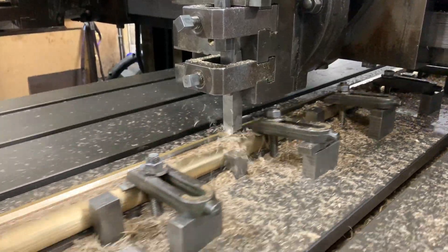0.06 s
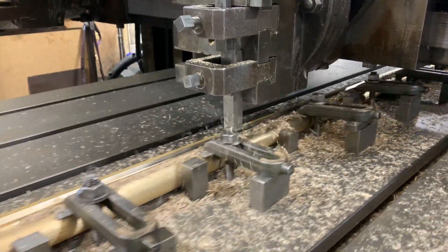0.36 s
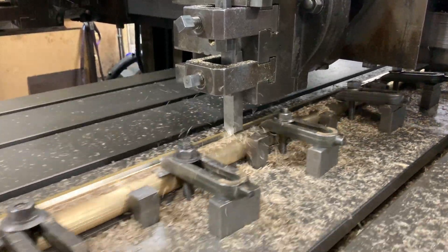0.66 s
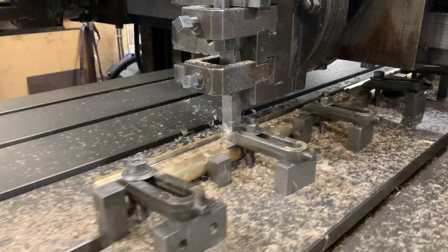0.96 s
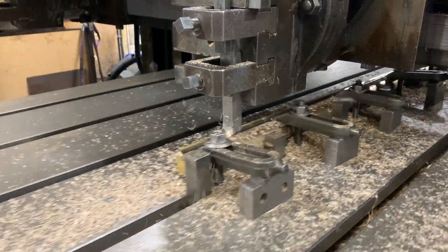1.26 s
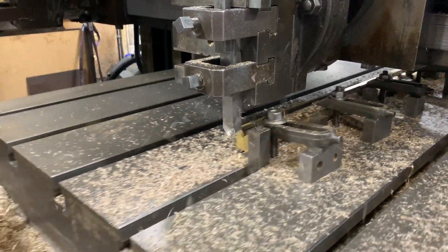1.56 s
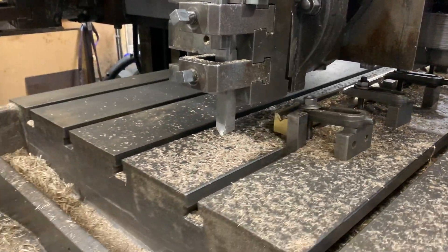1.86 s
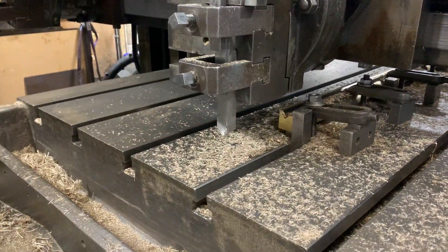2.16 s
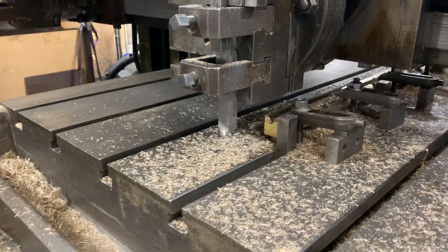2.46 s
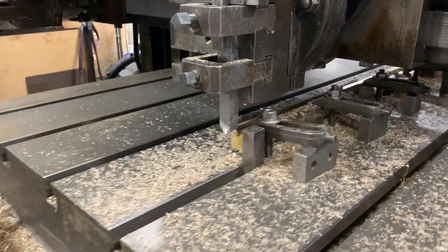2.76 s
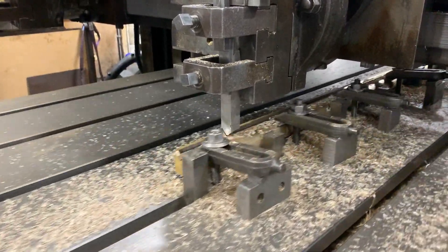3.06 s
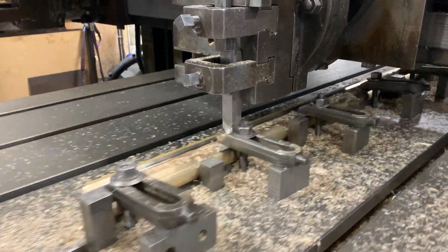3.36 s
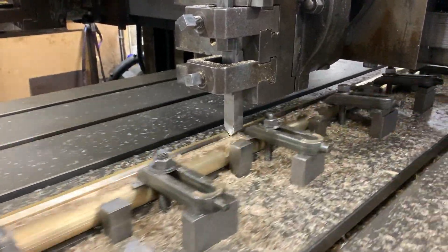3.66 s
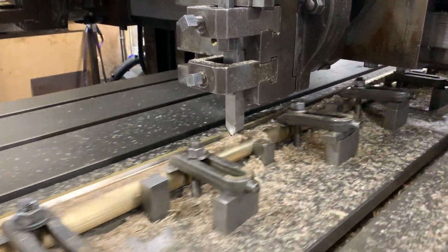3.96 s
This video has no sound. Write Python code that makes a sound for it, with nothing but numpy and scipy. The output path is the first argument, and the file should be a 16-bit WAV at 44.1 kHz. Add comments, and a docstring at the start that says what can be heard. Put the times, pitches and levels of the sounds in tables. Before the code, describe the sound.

A metal planer scrapes along a bar close by in a workshop, hissing and chattering with brief squeals over a machine rumble. The cut stops at about 1.5 seconds. Sharp steel clacks and knocks follow until 2 seconds as the drive reverses, then it sinks to a hum with a faint whirr. From about 3 seconds the gears rumble louder and whine upward as the table runs back.

```python
"""A metal planer's tool scrapes a chip off a bar, heard from beside the table in a workshop.
Tiny fractures hiss and excite the resonances of tool and bar; the shank chatters and briefly squeals.
The tool runs off the end and clacks in its holder. The drive knocks into reverse and sinks to a hum.
As the table speeds back, a bearing whirrs and the gears rumble, whine upward and ring their casing."""
import sys
import numpy as np
from scipy import signal
from scipy.fft import rfft, irfft, next_fast_len
from scipy.io import wavfile
from scipy.ndimage import uniform_filter1d, map_coordinates

SR = 44100
rng = np.random.default_rng(int(sys.argv[2]) if len(sys.argv) > 2 else 0)


def generate_wav(sig):
    """Save sig (samples, or channels by samples) to the path in sys.argv[1] as 16-bit PCM at SR."""
    pcm = np.round(np.clip(np.atleast_2d(sig).T, -1, 1) * 32767).astype(np.int16)
    wavfile.write(sys.argv[1], SR, pcm)


N = 176400
T = np.arange(N) / SR
CUT_END_S, CUT_T60_S, REVERSE_S = 1.556, 0.032, 1.905
TOOTH_SPREAD_DB = 1.5

# strength of the tool's chatter: t/s, level/dB
CHATTER = [(0, -26.5), (.1, -35), (.2, -41.5), (.33, -43), (.46, -34), (.62, -34.5), (.83, -40),
           (.88, -35.5), (1.0, -29), (1.2, -30.5), (1.33, -33.5), (1.5, -30)]
# load on the drive: t/s, rumble level/dB, gear rattle level/dB
DRIVE_LOAD = [(0, -41, -39.5), (.36, -39.5, -43), (.41, -34.5, -33.5), (.52, -36.5, -41), (.83, -41, -41),
              (1.05, -37.5, -36.5), (1.2, -37.5, -41.5), (1.42, -35.5, -37), (1.72, -35, -39.5),
              (1.82, -32.5, -33), (2.0, -40.5, -39.5), (2.25, -43.5, -41.5), (2.65, -36.5, -42),
              (3.0, -34.5, -39), (3.17, -31, -37), (3.55, -35.5, -34), (3.72, -32, -33), (4, -33.5, -33)]
# steel clacks of the tool holder: t/s, level/dB, T60/s
CLACKS = [(1.59, -19, 0.078), (1.7095, -16, 0.09), (1.7128, -14, .017)]
# gear mesh on the return stroke: t/s, f/Hz, level/dB
RETURN_MESH = [(2.8, 160, -60), (3.05, 178, -45), (3.17, 184, -31), (3.23, 192, -46), (3.34, 199, -32),
               (3.45, 203, -30.5), (3.56, 210, -38), (3.69, 215, -35), (3.77, 216, -27), (3.88, 217, -25),
               (4, 216, -22.5)]


def amp(db):
    """Amplitude ratio of a level."""
    return 10 ** (np.asarray(db) / 20)


def unit(x):
    """Normalisation to rms 1."""
    return x / np.sqrt(np.mean(x ** 2) + 1e-20)


def along(points, hz):
    """Interpolation of (f/Hz, value) points on a logarithmic frequency axis."""
    f, values = np.transpose(points)
    return np.interp(np.log(hz + 1), np.log(f + 1), values)


def curves(rows):
    """Linear interpolation in time: one value per sample for each column after t/s."""
    times, *columns = np.transpose(rows)
    return [np.interp(T, times, column) for column in columns]


def wobble(rate):
    """Smooth random modulation: a spline through rate Gaussian values a second."""
    return map_coordinates(rng.standard_normal(int(N * rate / SR) + 4), [T * rate])


def filtered(x, response):
    """Linear filtering: the spectrum of x times a complex frequency response."""
    size = next_fast_len(N + 8192)
    return irfft(rfft(x, size) * response(np.fft.rfftfreq(size, 1 / SR)), size)[..., :N]


def spread(pair, response):
    """Partial coherence: two independent signals, filtered, become the mid and side of a stereo pair."""
    # likeness of left and right: f/Hz, correlation
    coherence = [(60, 0.94), (200, 0.81), (350, 0.58), (600, 0.18), (1500, 0.0099), (3000, 0.081),
                 (4200, 0.62), (6300, 0.17), (7500, 1), (9000, 1), (15000, 1)]

    def blend(hz):
        angle = np.arccos(np.clip(along(coherence, hz), -1, 1)) / 2
        return response(hz) * np.array([np.cos(angle), np.sin(angle)])
    mid, side = filtered(pair, blend)
    return np.array([mid + side, mid - side])


def noise(spectrum, grain=1):
    """Source and filter: white noise, modulated by grain, takes on a spectrum; stereo, rms 1."""
    return unit(spread(grain * rng.standard_normal((2, N)), lambda hz: amp(along(spectrum, hz))))


def resonate(modes, grain=1, order=2):
    """Forced vibration: noise, modulated by grain, drives band-pass resonances; stereo, rms 1."""
    def response(f):
        return sum(amp(db) * (1j * f * width / (centre ** 2 - f ** 2 + 1j * f * width)) ** order
                   for centre, width, db in modes)
    return unit(spread(grain * rng.standard_normal((2, N)), response))


def tone(hz, db, drift_hz, flutter_db, rate=14):
    """A sinusoid under random frequency and amplitude modulation."""
    phase = 2 * np.pi * (np.cumsum(hz + drift_hz * wobble(rate)) / SR + rng.random())
    return np.sqrt(2) * amp(db + flutter_db * wobble(rate)) * np.sin(phase)


def decay(start, t60):
    """Damping: full level until start, then a fall of 60 dB per t60 seconds, down to -120 dB."""
    return amp(-60 * np.clip((T - start) / t60, 0, 2))


def strike(start, t60, attack_s=0.00067):
    """Envelope of an impact: a fast rise and an exponential decay."""
    return (1 - np.exp(-np.maximum(T - start, 0) / attack_s)) * decay(start, t60)


def blows(rows, spectrum):
    """Impacts excite a broad band: noise bursts of one spectrum, each with its own decay."""
    return noise(spectrum) * sum(amp(db) * strike(start, t60) for start, db, t60 in rows)


def room(x, wet_db):
    """Reverberation: adds the workshop's diffuse tail, whose treble dies first."""
    # reverberation time: f/Hz, T60/s
    reverb_times = [(200, 1), (2000, 1), (6000, 0.5), (14000, 0.22)]
    hz, t, spectra = signal.stft(rng.standard_normal((2, SR // 2)), SR, nperseg=256)
    absorption = amp(-60 * t / along(reverb_times, hz)[:, None])
    tail = signal.istft(spectra * absorption, SR, nperseg=256)[1]
    echo = signal.fftconvolve(np.atleast_2d(x), tail / np.linalg.norm(tail[0]), axes=1)[:, :N]
    return x + amp(wet_db) * spread(echo, np.ones_like)


def waver(x, depth=0.006):
    """Frequency modulation: the pitch wanders as the chip thickens and thins."""
    positions = np.arange(N) + depth * np.cumsum(wobble(12))
    return np.array([map_coordinates(side, [positions], order=5, mode="mirror") for side in x])


def patchy(x, depth_db):
    """Amplitude modulation by band: parts of the spectrum flare and fade on their own; rms 1."""
    spectra = signal.stft(x, nperseg=512)[2]
    field = uniform_filter1d(rng.standard_normal(spectra.shape[1:]), size=4, axis=0)
    field = unit(uniform_filter1d(field, size=7, axis=1))
    return unit(signal.istft(spectra * amp(depth_db * field), nperseg=512)[1][:, :N])


def scrape():
    """Random excitation: the chip's tiny fractures hiss, ring tool and bar and make the shank chatter."""
    # hiss of the tearing chip: f/Hz, level/dB
    chip_spectrum = [(300, 0), (1300, -9), (2800, -6.5), (4800, -2), (6500, -5), (9500, 0), (11900, -8.5),
                     (13200, -8), (15600, -13)]
    # resonances of tool and bar: f/Hz, bandwidth/Hz, level/dB
    tool_modes = [(3865, 86, -1.5), (4102, 170, 5.5), (4262, 83, 5.5), (5670, 180, 5), (5850, 26, 11.5),
                  (6043, 270, 5.5), (7070, 300, -3.5), (7710, 480, -1.5), (10140, 330, 1),
                  (10590, 360, -1.5), (11770, 470, -5.5)]
    # bending modes of the shank: f/Hz, bandwidth/Hz, level/dB
    shank_modes = [(877, 94, -9.5), (1709, 92, 4), (1791.6, 120, 5), (3547, 154, -13.5)]
    # how hard the tool bites: t/s, gain/dB
    bite = [(0, 0.5), (.8, 0.5), (1.0, 0), (1.44, 0.5), (1.5, 3), (1.55, 6)]
    bite_db, = curves(bite)
    chatter_db, = curves(CHATTER)
    cracks = amp(0.5 * wobble(1800) + 1.5 * wobble(69.73))
    hiss = amp(-39.5) * patchy(noise(chip_spectrum, cracks), depth_db=2.7)
    ring = amp(-36.5) * patchy(waver(resonate(tool_modes, cracks)), depth_db=2.5)
    chatter = amp(chatter_db + 0.37 * wobble(61)) * resonate(shank_modes, cracks, order=3)
    return room((amp(bite_db) * (hiss + ring) + chatter) * decay(CUT_END_S, CUT_T60_S), wet_db=-11)


def squeals():
    """Nonlinear oscillation: the shank sings, and its overtones grow faster than its swing."""
    # moments when the chatter locks into a squeal: t/s, level/dB, half length/s
    surges = [(.408, -27, .0047), (.554, -23.5, .0055), (.878, -30, .009), (.968, -29, .007),
              (1.024, -23.5, .0078), (1.047, -18, .0089), (1.122, -26, .013), (1.255, -28, .01),
              (1.302, -24.5, .009), (1.375, -22, .0065), (1.487, -25.5, .012), (1.546, -25, .008)]
    # harmonics of a full squeal, from the second up: relative level/dB
    overtones_db = [-8.5, -26, -15, -14, -8, -22]
    squeal_hz, full_db, sustain_db = 1775, -17, -6.5
    overtone_growth, jitter_rad = 1.9, 0.15
    chatter_db, = curves(CHATTER)
    steady = amp(chatter_db + sustain_db + 0.41 * wobble(54.2)) * decay(CUT_END_S, CUT_T60_S)
    peaks = sum(amp(db) * np.exp(-((T - centre) / half) ** 2) for centre, db, half in surges)
    swing = np.hypot(steady, peaks) / amp(full_db)
    phase = 2 * np.pi * np.cumsum(squeal_hz + 22 * wobble(160)) / SR
    overtones = sum(amp(db) * np.sin(k * phase + jitter_rad * k * wobble(600))
                    for k, db in enumerate(overtones_db, start=2))
    vibration = swing * np.sin(phase) + swing ** overtone_growth * overtones
    return room(np.sqrt(2) * amp(full_db) * vibration, wet_db=-13)


def drive():
    """Structure-borne sound: bed and gears shake under load, over the motor's hum and a rush of air."""
    # rumble of bed and table: f/Hz, level/dB
    rumble_spectrum = [(25, -35), (45, -19), (85, -19), (115, -14), (160, 2), (192, 2.5), (225, 4.5),
                       (258, -4), (295, 6), (350, 2.5), (400, 0.5), (455, 3.5), (560, -9), (900, -11.5),
                       (2500, -40.5)]
    # resonances of the bed: f/Hz, bandwidth/Hz, level/dB
    bed_modes = [(193, 6.3, -4.5), (229.7, 7, -4), (294.2, 15.7, 5.5), (333, 21, -3.5)]
    # rattle of the gear train: f/Hz, level/dB
    gear_spectrum = [(250, 6.5), (480, -8.5), (600, 3), (700, 7), (790, 4.5), (885, 7), (1030, -1.5),
                     (1200, -1.5), (1450, -2.5), (1800, -9), (2600, -11), (5000, -25.5)]
    # tones of motor and shafts: f/Hz, level/dB
    motor_tones = [(49.5, -54), (62.3, -53)]
    # workshop air and belts: f/Hz, level/dB
    air_spectrum = [(40, 0), (400, -6), (1500, -3), (2000, -2.5), (2550, -5.5), (3100, -12), (3600, -7.5),
                    (4600, -12.5), (6400, -10.5), (8500, -15), (12500, -14), (13500, -21), (15700, -32)]
    rumble_db, rattle_db = curves(DRIVE_LOAD)
    rumble_gain = amp(rumble_db + 0.65 * wobble(30.83))
    rumble = rumble_gain * (noise(rumble_spectrum) + amp(-7.5) * resonate(bed_modes))
    rattle = amp(rattle_db + 1.02 * wobble(45)) * noise(gear_spectrum, amp(TOOTH_SPREAD_DB * wobble(350)))
    hum = sum(tone(hz, db, drift_hz=0.61, flutter_db=3) for hz, db in motor_tones)
    hum *= amp(0.25 * (rumble_db - rumble_db.mean()))  # follows a quarter of the rumble's swing in dB
    air = amp(-44 + 0.43 * wobble(25.22)) * noise(air_spectrum)
    return rumble + rattle + hum + air


def cutting_gears():
    """Periodic tooth contact: steady tones follow the load and die away once the drive reverses."""
    # gear tones of the cutting stroke: f/Hz, level/dB relative to the rumble
    gear_tones = [(191, -8), (218, -8.5), (281, -9.5), (413, -7.5)]
    load_db, _ = curves(DRIVE_LOAD)
    tones = sum(tone(hz, load_db + db, drift_hz=1.2, flutter_db=1.5) for hz, db in gear_tones)
    return tones * decay(REVERSE_S, t60=0.62)


def holder_clacks():
    """Impact noise: the steel holder clacks and rattles to rest."""
    # rattles as it settles: t/s, level/dB, T60/s
    rattles = [(1.738, -39, .12), (1.762, -36, .11), (1.801, -33.5, .07), (1.866, -41, .07)]
    # spectrum of a clack or rattle: f/Hz, level/dB
    clack_spectrum = [(300, 0), (1500, 5.5), (2400, 5.5), (3000, 4.5), (3500, 2), (4300, 11), (5200, 1.5),
                      (7000, 5), (9000, 7.5), (12000, 4.5), (14000, -1)]
    return room(blows(CLACKS + rattles, clack_spectrum), wet_db=-9)


def drive_knocks():
    """Impulse excitation: each knock of the reversing drive, and a small tick of the gears on the return
    stroke, sets its hollow housing ringing."""
    # knocks of the drive: t/s, level/dB, T60/s
    knocks = [(1.633, -29, .1), (1.746, -28, .14), (1.765, -27.5, .12), (1.7945, -19, .025),
              (1.802, -19, .035), (3.451, -27, .03)]
    # spectrum of a knock: f/Hz, level/dB
    knock_spectrum = [(50, -20), (150, -5), (300, 4), (380, -2), (495, 7), (620, -4), (850, -2),
                      (1100, -11), (1500, -10), (2100, -21), (3200, -25), (8000, -44), (15000, -60)]
    ring_envelope = sum(amp(db) * strike(start, t60=0.055) for start, db, _ in knocks)
    housing = tone(hz=505, db=-3, drift_hz=10.24, flutter_db=10.5) * ring_envelope
    return room(blows(knocks, knock_spectrum) + housing, wet_db=-10)


def holder_ring():
    """Free vibration: the holder's damped modes ring on after the hardest clack."""
    # modes of the holder: f/Hz, relative level/dB, T60/s
    holder_modes = [(1190, -25, .09), (1765, -23, .12), (2990, -23, .07), (4441, -15.5, .115),
                    (4500, -13.5, .115), (6939, -21, .07), (12660, -17, .05)]
    hardest_s, _, _ = max(CLACKS, key=lambda row: row[1])
    return sum(tone(hz, db - 8, drift_hz=15, flutter_db=1, rate=150) * strike(hardest_s, t60)
               for hz, db, t60 in holder_modes)


def linkage_ticks():
    """Light impacts: the shift linkage gives short, bright transients."""
    # ticks of the linkage: t/s, level/dB, T60/s
    ticks = [(1.806, -29, .05), (1.867, -32, .05), (2.018, -27, .035)]
    # spectrum of a tick: f/Hz, level/dB
    tick_spectrum = [(400, -17), (1400, 3), (2200, -9), (3000, 3), (3200, 10), (3400, 4), (3700, -20),
                     (4200, -12), (8000, -20), (15000, -28)]
    return room(blows(ticks, tick_spectrum), wet_db=-12)


def bearing_whirr():
    """Amplitude modulation: on the return stroke a bearing's narrow-band noise pulses with its shaft."""
    centre_hz, bandwidth_hz, shaft_hz = 2235, 165, 12.2
    onset = 1 - decay(REVERSE_S, t60=1)
    turn = np.sin(2 * np.pi * shaft_hz * T)
    return onset * amp(-51 + 3.2 * turn) * resonate([(centre_hz, bandwidth_hz, 0)])


def return_gears():
    """Mesh frequency is proportional to speed: the gears' whine climbs as the table runs back."""
    # partials of the mesh tone: frequency ratio, relative level/dB
    partials = [(1, 0), (1.5, -16), (2, -17), (3.9, -19)]
    # thin whine of the gearbox: t/s, f/Hz, level/dB
    whine_track = [(3.42, 484, -60), (3.52, 489, -42), (3.62, 491, -37.5), (3.72, 492, -42),
                   (3.82, 494, -46), (4, 496, -42)]
    mesh_hz, mesh_db = curves(RETURN_MESH)
    mesh = sum(tone(k * mesh_hz, mesh_db + db, drift_hz=1.2 * k, flutter_db=0.7, rate=30)
               for k, db in partials)
    whine = tone(*curves(whine_track), drift_hz=1, flutter_db=1.5)
    return (mesh + whine) * (T > REVERSE_S)


def gearbox_casing():
    """Forced resonance: the racing gears ring their casing, harder once per turn of the shaft."""
    # ringing that swells on the return stroke: t/s, level/dB
    swell = [(2.6, -52), (3.0, -45), (3.25, -37), (3.36, -34), (3.52, -32), (3.62, -32.5), (3.75, -37),
             (4, -38)]
    # resonances of the casing: f/Hz, bandwidth/Hz, level/dB
    casing_modes = [(440, 14, -3), (492, 12, -1), (845, 30, -2), (890, 45, 0), (1015, 70, -3),
                    (1400, 220, -13)]
    teeth, pulse_db = 14, 2
    swell_db, = curves(swell)
    mesh_hz, _ = curves(RETURN_MESH)
    turn = np.sin(2 * np.pi * np.cumsum(mesh_hz / teeth) / SR)
    return amp(swell_db + pulse_db * turn) * resonate(casing_modes, amp(TOOTH_SPREAD_DB * wobble(350)))


def scene():
    """Superposition: the cut, the running machinery and the impacts add."""
    cut = scrape() + squeals()
    machinery = drive() + cutting_gears() + return_gears() + gearbox_casing() + bearing_whirr()
    ring = holder_ring()
    impacts = drive_knocks() + holder_clacks() + room(ring, wet_db=-19) + linkage_ticks()
    return cut + machinery + impacts


def record(dry):
    """Spaced microphones differ in level and phase; the deepest bass and the top treble are cut."""
    # left over right: f/Hz, level difference/dB
    balance = [(50, 1), (300, 2), (900, 3.5), (1800, 1.5), (2800, 1), (4500, -2.5), (6000, -5),
               (7500, -0.5), (15000, 0.5)]
    # lead of the left: f/Hz, phase/rad
    lead = [(0, 0), (2200, 0), (3500, 1), (5300, 1.6), (6500, 0), (8650, -3.14), (11000, -6.28),
            (13350, -9.42), (15500, -12.57)]
    low_cut_hz, top_hz = 50, 15800
    sides = np.array([[0.5], [-0.5]])

    def response(hz):
        gain = amp(sides * along(balance, hz))
        phase = sides * np.interp(hz, *np.transpose(lead))
        low_cut = 1 / np.sqrt(1 + (low_cut_hz / (hz + 1)) ** 10)
        return gain * np.exp(1j * phase) * low_cut * (hz < top_hz)
    return filtered(dry, response)


dry = scene()
out = record(dry)
generate_wav(out)
```